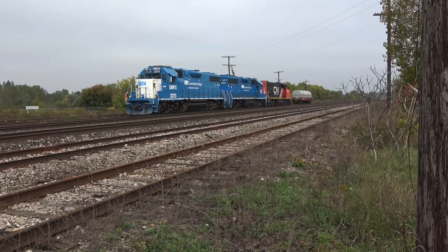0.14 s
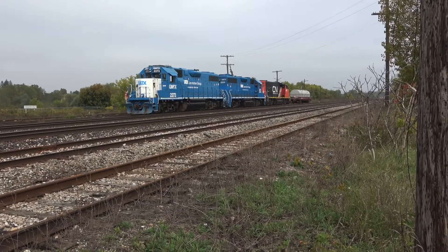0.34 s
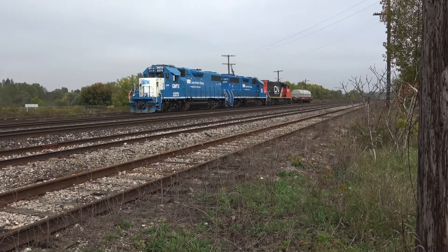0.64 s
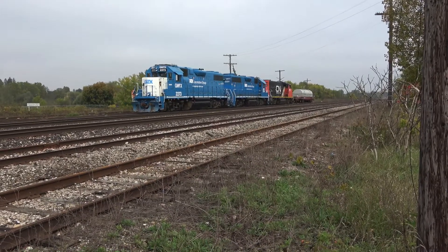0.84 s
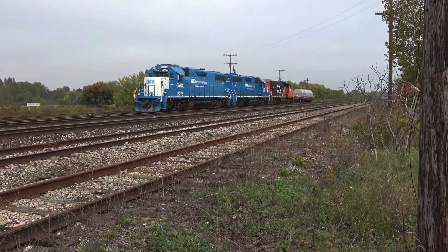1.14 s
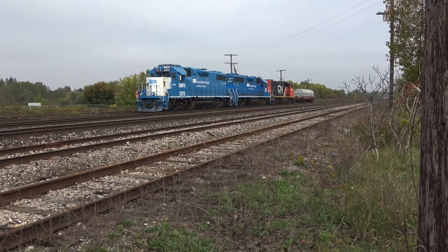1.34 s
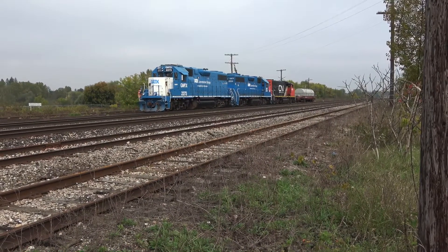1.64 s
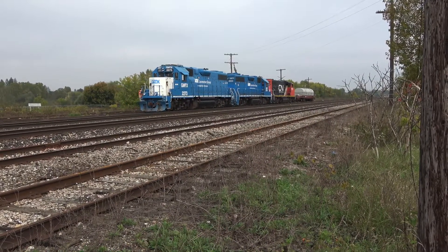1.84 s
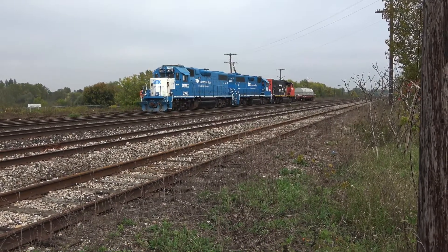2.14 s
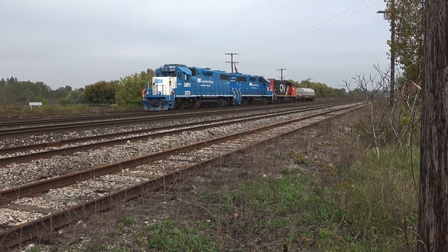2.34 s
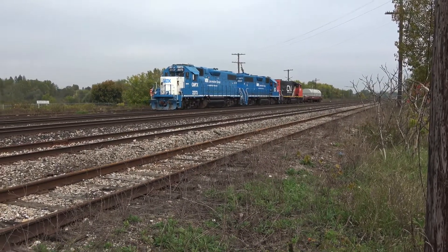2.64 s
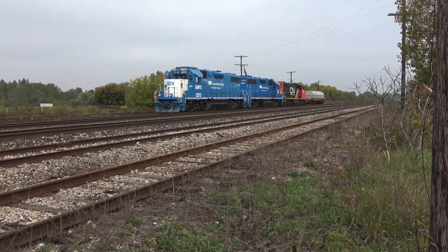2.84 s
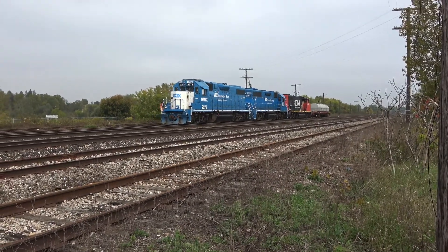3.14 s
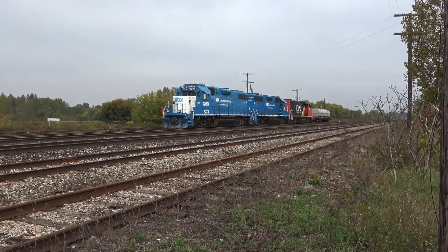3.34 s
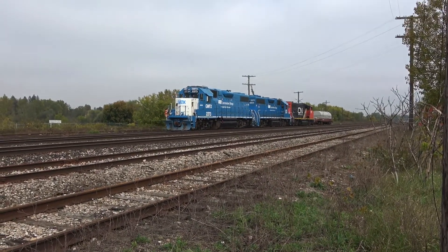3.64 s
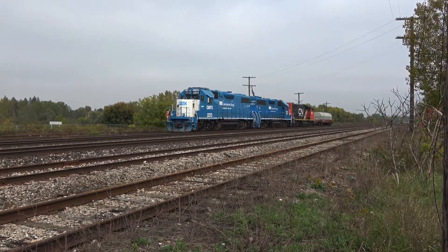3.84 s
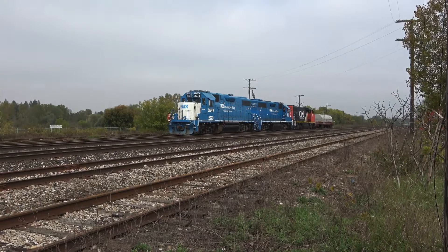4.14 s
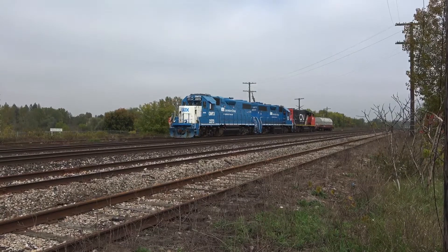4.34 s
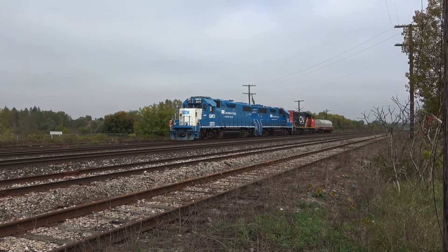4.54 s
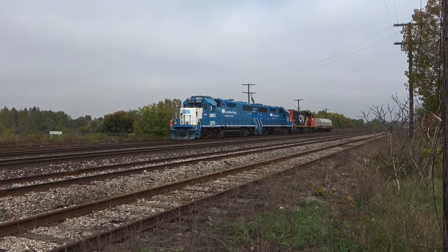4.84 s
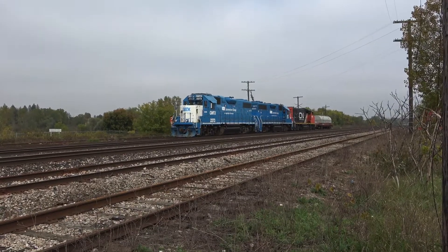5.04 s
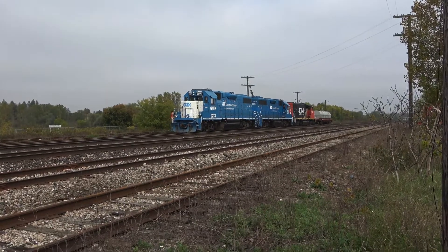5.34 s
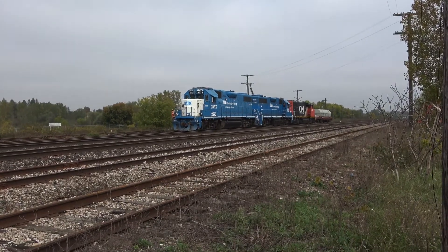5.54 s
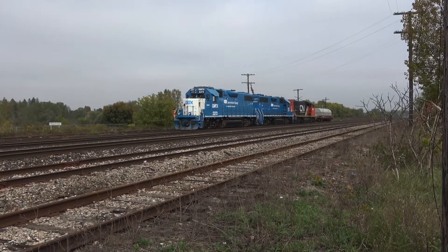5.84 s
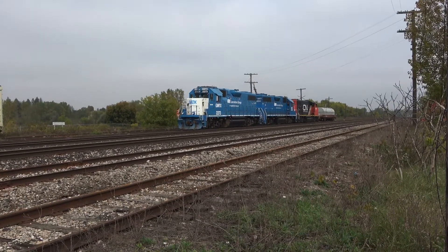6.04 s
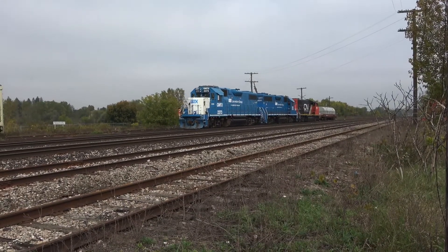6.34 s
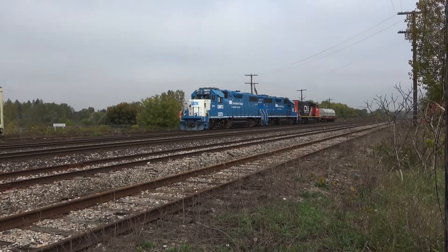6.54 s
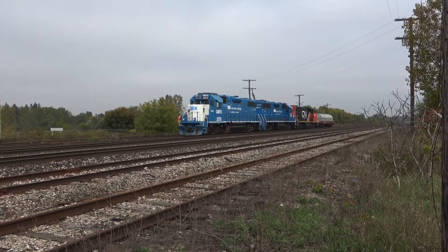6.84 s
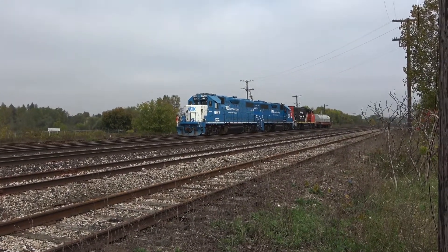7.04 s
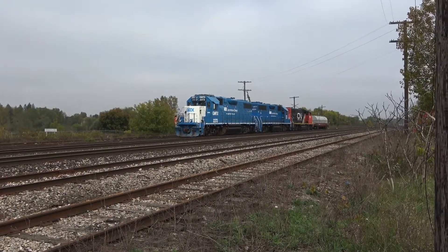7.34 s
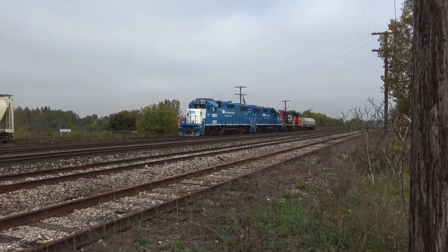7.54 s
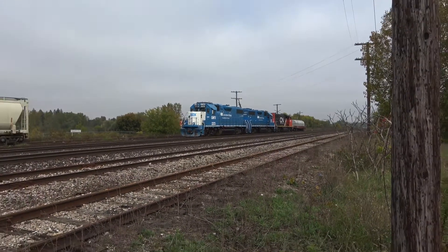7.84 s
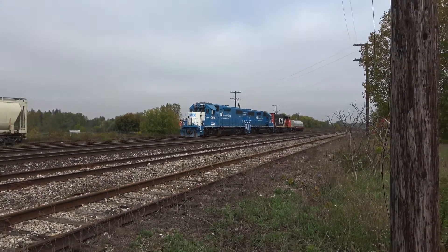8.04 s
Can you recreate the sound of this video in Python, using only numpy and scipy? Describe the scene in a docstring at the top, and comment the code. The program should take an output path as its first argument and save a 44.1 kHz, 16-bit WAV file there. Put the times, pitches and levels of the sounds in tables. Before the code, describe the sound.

Two diesel locomotives idle across rail sidings with a throbbing low drone, steady air hiss, pulsing puffs and a thin gear whine, while crickets trill nearby.

```python
"""Locomotives idling beyond the grass

Two diesel locomotives idle slowly along distant sidings, their cranks turning at slightly different speeds.
Sixteen uneven firings a turn shape exhaust tones that throb over noise roar and a whine of gear teeth.
A valve puffs filtered noise once a turn of the lead crank, over a steady leak and a dying air release.
Crickets trill in short arched tones, a grasshopper rasps in clicks of noise, and wind stirs at the microphone."""
import sys
import numpy as np
from scipy import signal
from scipy.fft import rfft, irfft
from scipy.io import wavfile

SR = 44100
rng = np.random.default_rng(int(sys.argv[2]) if len(sys.argv) > 2 else 0)


def wav_out(sig):
    """Save sig, one row per channel (or a flat mono array), as 16-bit PCM at SR to the path in sys.argv[1]."""
    wavfile.write(sys.argv[1], SR, np.round(np.clip(np.atleast_2d(sig).T, -1, 1) * 32767).astype(np.int16))


N = 361619

# Wind at the microphone: (time [s], level before its wobble [dB])
GUSTS = [(0, -87), (1.5, -60), (3.5, -61), (4.5, -56), (5.5, -53), (6.5, -61), (7.5, -52.5), (8.2, -51)]

# Blur of far insects: (frequency [Hz], relative level [dB])
INSECT_BLUR = [(4500, -48), (5800, -4), (6800, 0), (7600, 7), (8600, 4.5), (9600, -10), (12000, -19),
               (15000, -32)]
# Pace of each cricket, held until the next row, 0 = silent: (time [s], pace [strokes per s])
NEAR_CRICKET = [(0.148, 16.94), (1.92, 17.0), (2.509, 17.15), (3.15, 16.62), (4.112, 14.9), (4.313, 17.5),
                (4.541, 17.2), (5.477, 17.2), (7.512, 16.2), (8.005, 16.9)]
MIDDLE_CRICKET = [(.968, 17.5), (2.5, 0), (5.012, 16.9), (5.45, 0)]
RIGHT_CRICKET = [(0.823, 19.1), (0.98, 17.97), (2.34, 0), (2.72, 18.44), (5.24, 0), (5.398, 19),
                 (5.608, 18.4), (6.66, 0)]
SLOW_CRICKET = [(0.074, 8.15), (.6, 0), (6.735, 9), (6.957, 8.05), (7.98, 0), (8.103, 8)]
# Loudness of three crickets as they turn about: (time [s], near [dB], right [dB], slow [dB])
CRICKET_LEVEL = [(0, -53, -56, -53), (.6, -50.5, -54, -52), (1.3, -56, -53, -52), (1.9, -54, -52, -54),
                 (2.5, -56, -52, -54), (3, -50, -59, -54), (3.3, -53.5, -52, -54), (3.9, -50.5, -50, -54),
                 (4.3, -55, -53, -54), (4.85, -50, -50, -54), (5.5, -52, -51, -52), (6.2, -49.5, -50, -54),
                 (6.9, -52.5, -54, -51), (7.5, -54, -55, -51), (8.2, -51, -52, -50)]
# Voice of the middle cricket: (time [s], pitch [Hz], level [dB], left ear gain [dB])
MIDDLE_VOICE = [(0, 7740, -55, -9), (1.4, 7740, -52, -13), (2.5, 7740, -55, -9), (5, 7850, -64, -6),
                (8.2, 7940, -55, -2)]
STROKE_JITTER_S, STROKE_SCATTER_DB = .001, 1.1
# each slow chirp has a weaker, lower second stroke
ANSWER_S, ANSWER_DB, ANSWER_HZ = .053, -5, 8000

# Short dry rasps, perhaps a grasshopper: (start time [s], level [dB])
RASPS = [(3.624, -50.5), (3.808, -54), (3.918, -49), (3.966, -53), (4.0, -54), (4.038, -59), (4.069, -51),
         (4.182, -54)]
# Tone of the rasp: (frequency [Hz], relative level [dB])
RASP_COLOUR = [(5500, -30), (6600, -1), (8000, -3), (9200, -5), (10000, -16), (12500, -24), (15000, -40)]
RASP_S, RASP_TEETH_PER_S = .022, 330

# Dry ticks close by: (time [s], relative level [dB])
TICKS = [(0.1674, -54), (0.384, -54), (0.411, -55), (2.4374, -60.5), (2.4447, -43), (2.4872, -51),
         (2.8404, -56), (3.0879, -56)]

# Breathy bands that swell for a while:
# (start time [s], end time [s], fade [s], level [dB], centre [Hz], width [Hz])
HOWLS = [(2.85, 3.95, .3, -48.5, 1993, 103), (6.7, 8.2, .5, -54, 2300, 130)]

# Crank speed of each governed engine: (time [s], speed [turns per s])
LEAD_SPEED = [(0, 5.165), (5, 5.175), (6.6, 5.166), (7.2, 5.162), (8.2, 5.14)]
SECOND_SPEED = [(0, 4.978), (5, 4.984), (6.6, 4.975), (8.2, 4.96)]

# Gear whine and its neighbour:
# (time [s], whine level [dB], pitch sag [Hz], neighbour relative level [dB])
WHINE = [(0, -46.5, 1.5, -66), (1.4, -42, -1, -69), (2.0, -42, 0, -55), (3.2, -43.5, 0, -52),
         (3.8, -47.5, 0.5, -53), (4.8, -43.5, -1, -52), (5.5, -45.5, 0.5, -50), (6.2, -45, 0.5, -52),
         (6.7, -46.5, 1.5, -47.5), (7.25, -50, 1.5, -48), (7.5, -59, 11, -47), (7.8, -48, 10, -64),
         (8.0, -53, -4.5, -56), (8.2, -50, -1, -58)]
WHINE_TEETH, LOW_WHINE_TEETH, HIGH_WHINE_TEETH = 237, 227, 316   # meshes per turn of the lead crank
# Short thin squeals: (centre time [s], level [dB], pitch [Hz])
SQUEALS = [(3.4, -59, 3000), (3.7, -59, 3000), (5.47, -56, 3020), (5.65, -56.5, 3010), (5.9, -55.5, 3020),
           (6.07, -58, 3010), (6.24, -56.5, 3010), (6.42, -55, 2990), (6.55, -57, 3000), (6.7, -59, 3000)]
SQUEAL_S = .21

# Tone of the steady leak: (frequency [Hz], relative level [dB])
HISS_COLOUR = [(1470, -15), (2500, -3), (3000, -3.5), (3610, -8.5), (5660, -7.5), (6540, -12), (7740, -12),
               (9440, -21.5), (14600, -32.5), (15500, -38)]
# Tone of the air release: (frequency [Hz], relative level [dB])
RELEASE_COLOUR = [(1470, -5.5), (2500, -1), (3600, -3.5), (5700, -6.5), (7700, -9), (9400, -19),
                  (11000, -15.5), (12500, -33), (15500, -39)]
# Tone of the bright and lower parts of a puff: (frequency [Hz], relative level [dB])
BRIGHT_JET = [(6500, -6), (8500, 0.5), (10500, -1.5), (13500, -10), (15500, -22)]
LOW_JET = [(2800, -17), (4500, 0), (5500, 6), (6500, 2.5), (8000, 0), (10000, -30)]
# Strength of the valve puffs: (time [s], bright relative level [dB], lower relative level [dB])
PUFF_FORCE = [(0, -52, -43), (.25, -64, -54), (.7, -62, -61), (1.2, -58, -54), (1.7, -69, -55),
              (2, -57, -52), (2.5, -60, -53), (2.95, -58, -51), (3.3, -59, -52), (3.52, -57, -46),
              (3.72, -63, -51), (3.9, -61, -54), (4.1, -65, -54), (4.3, -59, -54), (5.5, -72, -62.5),
              (6.5, -58, -56), (7, -66, -50), (7.3, -61, -57), (7.75, -76, -55), (8.2, -55, -48)]
# Stray spits of air between the puffs: (time [s], bright relative level [dB], lower relative level [dB])
SPITS = [(0.07, -63, -49), (0.148, -64, -58.7), (0.31, -62, -53)]
LEAK_DB, LEAK_WANDER_DB = -50.5, .5
RELEASE_DB, RELEASE_T60_S = -45, 13.3
PUFF_TURN, PUFF_SCATTER_DB = .19, .8   # crank angle of the puff in turns; chance per puff
PUFF_SPURT_S, PUFF_TAIL_S, PUFF_TAIL_DB = .03, .07, -5   # a quick spurt, then a softer tail

# Tone of the blowers and fans: (frequency [Hz], relative level [dB])
ROAR_COLOUR = [(15, -28), (30, -23), (45, -13), (90, -14), (170, -5.5), (310, -14.5), (470, -12.5),
               (710, -11), (830, -13), (950, -21.5), (1120, -18.5), (1500, -23), (2100, -23), (3000, -32),
               (4500, -39.5), (7000, -86)]
ROAR_DB, ROAR_EARLY_DB, ROAR_SETTLE_S = -33, 2, 0.66   # louder at first, then settles

# Exhaust tones of each engine: (multiple of crank speed [orders], level before its waver [dB])
LEAD_ORDERS = [(7, -59), (8, -48), (9, -48), (11, -59), (16, -56), (17, -62), (18, -60), (19, -51.5),
               (21, -55), (22, -49), (23, -49.5), (24, -44), (25, -55), (26, -56), (27, -59), (28, -57),
               (29, -49.5), (30, -46), (31, -43), (32, -35), (33, -38.5), (34, -38), (35, -40), (36, -45),
               (37, -53), (38, -56), (39, -54), (42, -55), (43, -58), (48, -51.5), (70, -52.5), (77, -53),
               (79, -54.5), (99, -54), (106, -54.5), (109, -54.5), (126, -51), (127, -58), (129, -62),
               (131, -58), (133, -62), (136, -62), (137, -62.5), (142, -52), (151, -56), (158, -51.5)]
SECOND_ORDERS = [(8, -47), (9, -53), (11, -51), (12, -58), (13, -51.5), (14, -58), (15, -59), (16, -59),
                 (17, -57), (21, -55), (22, -54), (23, -54), (24, -50), (25, -50), (26, -62), (27, -52),
                 (30, -51), (31, -51), (32, -43), (33, -50.5), (34, -45), (35, -45), (36, -41), (37, -49),
                 (38, -50), (40, -48), (42, -56), (45, -62), (48, -61), (80, -58), (82, -59), (110, -64),
                 (113, -55), (120, -52.5), (131, -65), (132, -54), (133, -55.5), (134, -53.5), (136, -64),
                 (138, -57), (142, -55), (143, -59), (145, -57), (147, -55), (156, -56), (164, -53)]
# Sixteen firings in one turn of each crank, used only to line up the tones: one column, strength [dB]
LEAD_FIRING = [-1, -2, -6.5, -14, -2.5, -1, -5, -20, -12, -12, -15, -7, -2, 0, -.5, -1.5]
SECOND_FIRING = [-6, -12, -4, 0, -.5, -4, -16, -10, -7, -14, -5, -4, -8, -6, -5, -7]
LEAD_START_TURN = -.0045   # crank angle of the lead engine at the start, against the second
DRONE_ORDER = 32   # the tone that the pipes favour

# Echoes off the ballast; the long lag slides as the train moves, its treble on a path of its own:
# (time [s], lag [ms], level [dB], short echo level [dB], treble lag [ms], treble level [dB])
ECHO = [(0, 1.56, -7.5, -16, 1.6, -11), (2.5, 1.63, -8.5, -23, 1.5, -8),
        (3.1, 1.37, -10, -15.5, 1.41, -9.5), (3.6, 1.37, -13, -12, 1.34, -7),
        (3.95, 1.43, -5.5, -8, 1.5, -11), (4.3, 1.54, -11, -25, 1.53, -4),
        (5.9, 1.57, -10, -18.5, 1.59, -10), (7, 1.6, -10, -27, 1.71, -10.5),
        (8.2, 1.73, -15, -24, 1.83, -10)]
SHORT_ECHO_MS, ECHO_CUT_HZ, TREBLE_FROM_HZ = 0.97, 2800, 1880
ECHO_LEFT_HZ, ECHO_LEFT_DB = 1480, -21   # the upper part of the long echo leans left by this share

# Stereo lean of the train: (frequency [Hz], left minus right [dB])
LEAN = [(40, -1.5), (80, -1.6), (140, -.5), (230, -.1), (300, -1.3), (420, -5), (560, -3.8), (770, -4.6),
        (950, -5), (1150, -2.7), (1450, -5), (1750, -1.2), (2100, -2.4), (2800, -1.6), (4400, -1),
        (6000, -1.4), (9000, -.5), (15000, -.5)]
CUTOFF_HZ = 15700


def from_db(db):
    """Decibels to gain."""
    return 10 ** (np.asarray(db) / 20)


def rms_one(x):
    """Scales a signal to rms 1."""
    return x / np.sqrt(np.mean(x ** 2) + 1e-20)


def in_time(rows):
    """Draws each column of a table as a curve, sample by sample."""
    s, *columns = np.transpose(rows)
    return [np.interp(np.arange(N) / SR, s, column) for column in columns]


def coloured(x, points):
    """Filters by a (frequency [Hz], gain [dB]) spectrum, joined up along log frequency."""
    hz, db = np.transpose(points)
    grid = np.maximum(np.fft.rfftfreq(N, 1 / SR), 1)
    gain = from_db(np.interp(np.log(grid), np.log(hz), db))
    return irfft(rfft(x) * gain, N)


def drift(rate):
    """Slow random wander with spread 1; a higher rate moves faster."""
    r = np.exp(-80 * np.pi * rate / SR)
    # made at a fortieth of the sample rate, its run-in dropped
    noise = rng.standard_normal(N // 40 + 2002)
    slow = signal.lfilter([1], [1, -2 * r, r * r], noise)[2000:]
    return np.interp(np.arange(N) / 40, np.arange(len(slow)), rms_one(slow))


def humps(rows, width_s, delay_s=0):
    """A smooth swell of the given level centred on each (time [s], level [dB]) event."""
    marks = np.zeros(N)
    s, db = np.transpose(rows)
    at = np.clip((s + delay_s) * SR, 0, N - 1).astype(int)
    marks[at] = from_db(db)
    return signal.fftconvolve(marks, np.hanning(int(width_s * SR)), "same")


def swell(start_s, end_s, fade_s, db):
    """Rises before the start, holds, and falls after the end."""
    corners_s = [start_s - fade_s, start_s, end_s, end_s + fade_s]
    return from_db(db) * np.interp(np.arange(N) / SR, corners_s, [0, 1, 1, 0])


def sine(hz):
    """A tone of rms 1 that follows a pitch curve from a random phase."""
    return np.sqrt(2) * np.sin(2 * np.pi * (np.cumsum(hz) / SR + rng.random()))


def breeze():
    """Light wind on the microphone ports: lumpy low noise, its own in each."""
    band = signal.butter(2, [18, 260], "band", fs=SR, output="sos")
    low = signal.sosfilt(band, rng.standard_normal((2, N)))
    return from_db(in_time(GUSTS)[0] + 2.5 * drift(9.5)) * rms_one(low)


def chorus(count):
    """Farther crickets, each trilling at its own pitch and pace, over a blur that differs at each ear."""
    out = np.zeros((2, N))
    for hz, per_s, pan_db in rng.uniform([7650, 15, 4], [8050, 20, 12], (count, 3)):
        stroke_turns = np.cumsum(per_s + 0.65 * drift(0.75)) / SR
        stroke = np.maximum(np.cos(2 * np.pi * stroke_turns), 0) ** 3
        # the left ear moves by pan_db and level wanders in both
        gain = from_db(-65 + 3 * drift(.6) + pan_db * np.array([[-1], [0]]))
        out += gain * stroke * sine(hz + 90 * drift(6.0))
    blur = coloured(rng.standard_normal((2, N)), INSECT_BLUR)
    return out + from_db([[-63], [-60]]) * rms_one(blur)


def strokes(song, level_db):
    """Evenly paced wing strokes, each a little off in time and strength: (time [s], level [dB])."""
    start, per_s = np.transpose(song)
    ends = [*start[1:], N / SR]
    runs = [np.arange(a, b - .02, 1 / pace) for a, b, pace in zip(start, ends, per_s) if pace > 0]
    s = np.concatenate(runs)
    time_chance, level_chance = rng.standard_normal((2, len(s)))
    db = level_db[(s * SR).astype(int)] + STROKE_SCATTER_DB * level_chance
    return np.column_stack([s + STROKE_JITTER_S * time_chance, db])


def cricket(chirps, hz, fall_hz, arch_hz, width_s):
    """Each wing stroke is a short tone that arches in pitch and slides down, or up if fall_hz is negative."""
    even = chirps * [1, 0]   # same times, all at 0 dB
    sag = humps(even, width_s, delay_s=width_s / 2) - humps(even, width_s, delay_s=-width_s / 2)
    arch = 1 - humps(even, width_s)
    pitch = hz - fall_hz * sag - arch_hz * arch + 18 * drift(12.0)
    return humps(chirps, width_s) * sine(pitch)


def crickets():
    """Trills from wing strokes: one cricket almost ahead, one between, two far to the right."""
    near_db, right_db, slow_db = in_time(CRICKET_LEVEL)
    near = cricket(strokes(NEAR_CRICKET, near_db), 7560, fall_hz=160, arch_hz=320, width_s=0.022)
    middle_hz, middle_db, left_db = in_time(MIDDLE_VOICE)
    middle = cricket(strokes(MIDDLE_CRICKET, middle_db), middle_hz, fall_hz=120, arch_hz=350, width_s=0.022)
    right_hz = 8150 + 35 * drift(.6)
    side = cricket(strokes(RIGHT_CRICKET, right_db), right_hz, fall_hz=-150, arch_hz=380, width_s=0.016)
    slow = strokes(SLOW_CRICKET, slow_db)
    side = side + cricket(slow, 8330, fall_hz=60, arch_hz=500, width_s=0.024)
    answer = slow + [ANSWER_S, ANSWER_DB]
    side = side + cricket(answer, ANSWER_HZ, fall_hz=60, arch_hz=200, width_s=0.018)
    out = near * from_db([[-3.5], [1.6]])
    out = out + middle * from_db([left_db, 0 * left_db])
    return out + side * from_db([[-13], [.9]])


def rasps():
    """A row of teeth scraped quickly: fast pulses in bright noise, with a quick start."""
    teeth = .35 + np.cos(np.pi * RASP_TEETH_PER_S * np.arange(N) / SR) ** 4
    marks = np.zeros(N)
    s, db = np.transpose(RASPS)
    marks[(s * SR).astype(int)] = from_db(db)
    envelope = np.convolve(marks, signal.windows.tukey(int(RASP_S * SR), .3))[:N]
    return envelope * teeth * rms_one(coloured(rng.standard_normal(N), RASP_COLOUR))


def ticks():
    """Tiny snaps, a few milliseconds of bright noise."""
    band = signal.butter(2, [8500, 14500], "band", fs=SR, output="sos")
    bright = signal.sosfilt(band, rng.standard_normal(N))
    return from_db(3.0) * humps(TICKS, .003, delay_s=.001) * bright


def howl(start_s, end_s, fade_s, db, hz, width_hz):
    """A breathy swell of noise through a narrow resonance."""
    band = signal.butter(2, [hz - width_hz / 2, hz + width_hz / 2], "band", fs=SR, output="sos")
    return swell(start_s, end_s, fade_s, db) * rms_one(signal.sosfilt(band, rng.standard_normal(N)))


def whine(hz, gain, flutter_db, wander_hz):
    """A tooth-mesh tone; the long air path makes it flutter in level and wander in pitch."""
    return gain * from_db(flutter_db * drift(30.0)) * sine(hz + wander_hz * drift(12.0))


def gears():
    """Three tooth meshes geared to the lead crank, and the thin squeals."""
    turns_per_s = in_time(LEAD_SPEED)[0]
    db, sag_hz, low_db = in_time(WHINE)
    out = whine(WHINE_TEETH * turns_per_s - sag_hz, from_db(db), flutter_db=3.2, wander_hz=2.0)
    out = out + whine(LOW_WHINE_TEETH * turns_per_s, from_db(low_db - 2.5), flutter_db=4.0, wander_hz=5.0)
    out = out + whine(HIGH_WHINE_TEETH * turns_per_s, from_db(-62), flutter_db=3.0, wander_hz=4.0)
    squeal_hz = in_time(SQUEALS)[1]
    squeal_gain = humps(np.array(SQUEALS)[:, :2], SQUEAL_S)
    return out + whine(squeal_hz, squeal_gain, flutter_db=3.5, wander_hz=14.0)


def puffs():
    """One puff each turn of the lead crank, and the stray spits: (time [s], bright [dB], lower [dB])."""
    turns = np.cumsum(in_time(LEAD_SPEED)[0]) / SR
    at = np.searchsorted(turns, np.arange(PUFF_TURN, turns[-1]))
    force = np.transpose(in_time(PUFF_FORCE))[at]
    force = force + PUFF_SCATTER_DB * rng.standard_normal((len(at), 2))
    return np.vstack([np.column_stack([at / SR, force]), SPITS])


def air():
    """Turbulent air as noise: a sputtering leak, a dying release, and puffs with a faint valve squeak after."""
    leak_rush, release_rush, jet = rng.standard_normal((3, N))
    leak = from_db(LEAK_DB + LEAK_WANDER_DB * drift(1.0)) * rms_one(coloured(leak_rush, HISS_COLOUR))
    release_db = RELEASE_DB - 60 * np.arange(N) / SR / RELEASE_T60_S
    release = from_db(release_db) * rms_one(coloured(release_rush, RELEASE_COLOUR))
    sputter = from_db(1.1 * drift(14.0))

    rows = puffs()
    bright, low = rows[:, [0, 1]], rows[:, [0, 2]]
    spurt = humps(bright, PUFF_SPURT_S, delay_s=-.006)
    spurt = spurt + from_db(PUFF_TAIL_DB) * humps(bright, PUFF_TAIL_S, delay_s=.01)
    puff = from_db(1.0) * spurt * rms_one(coloured(jet, BRIGHT_JET))
    puff = puff + humps(low, 0.038, delay_s=0.0026) * rms_one(coloured(jet, LOW_JET))
    squeak = from_db(1.5) * humps(bright, .045, delay_s=.037) * sine(4437 + 15 * drift(30.0))
    return sputter * (leak + release) + puff + squeak


def roar():
    """Broad noise of blowers and fans."""
    db = ROAR_DB + ROAR_EARLY_DB * np.exp(-np.arange(N) / SR / ROAR_SETTLE_S)
    return from_db(db) * rms_one(coloured(rng.standard_normal(N), ROAR_COLOUR))


def exhaust(speed, start_turn, orders, firing_db, waver_db, jitter_ms, scatter):
    """Sixteen uneven firings a turn set how the tones line up; far from the drone the pipes scatter them.
    Moving air makes groups of tones waver in level and arrival time, which blurs the high ones most."""
    turns_per_s = in_time(speed)[0]
    turns = start_turn + np.cumsum(turns_per_s) / SR
    angle = np.arange(4096) / 4096   # one turn of the crank
    patterns = np.zeros((6, 4096))   # six groups that waver apart
    beat = np.angle(np.fft.fft(from_db(firing_db)))
    slip = rng.standard_normal(200)
    for k, (order, db) in enumerate(orders):
        offset = beat[order % 16] + scatter * (order - DRONE_ORDER) * slip[order]
        patterns[k % 6] += np.sqrt(2) * from_db(db) * np.cos(2 * np.pi * order * angle + offset)
    out = np.zeros(N)
    for pattern in patterns:
        late_turns = turns_per_s * jitter_ms / 1000 * drift(3.4)
        tones = np.interp(turns + late_turns, angle, pattern, period=1)
        out += from_db(waver_db * drift(1.1)) * tones
    return out


def delayed(x, ms):
    """Reads a signal late by a steady or sliding lag."""
    now = np.arange(N)
    return np.interp(now - ms * SR / 1000, now, x)


def over_ballast(direct):
    """Dull echoes join the direct sound and cut notches that slide as the lag changes."""
    lag_ms, db, short_db, treble_ms, treble_db = in_time(ECHO)
    dull = signal.sosfilt(signal.butter(1, ECHO_CUT_HZ, fs=SR, output="sos"), direct)
    # the lowest tones find no clean echo
    near = coloured(dull, [(280, -25), (380, 0)])
    far = coloured(dull, [(330, -25), (620, 0)])
    treble_band = [(TREBLE_FROM_HZ / 1.15, -30), (TREBLE_FROM_HZ * 1.1, 0), (3000, 0), (4300, -12)]
    treble = coloured(far, treble_band)
    long_echo = from_db(db) * delayed(far - treble, lag_ms)
    long_echo = long_echo + from_db(treble_db) * delayed(treble, treble_ms)
    short_echo = from_db(short_db) * delayed(near, SHORT_ECHO_MS)
    upper = coloured(long_echo, [(ECHO_LEFT_HZ / 2.0, -40), (ECHO_LEFT_HZ, ECHO_LEFT_DB)])
    return direct + from_db([[.4], [-.6]]) * (long_echo + short_echo) + upper * [[1], [-1]]


def scene():
    """The train leans to one side by pitch; most of the crickets sit to the right."""
    tones = exhaust(LEAD_SPEED, LEAD_START_TURN, LEAD_ORDERS, LEAD_FIRING,
                    waver_db=1.2, jitter_ms=.24, scatter=.07)
    tones = tones + exhaust(SECOND_SPEED, 0, SECOND_ORDERS, SECOND_FIRING,
                            waver_db=1.5, jitter_ms=.28, scatter=.2)
    train = over_ballast(tones + roar() + air())
    train = train + gears() + sum(howl(*row) for row in HOWLS)
    train = train + from_db([[1.5], [-2]]) * ticks()
    # half of the lean goes to each ear
    left = coloured(train[0], [(hz, db / 2) for hz, db in LEAN])
    right = coloured(train[1], [(hz, -db / 2) for hz, db in LEAN])
    return np.array([left, right]) + crickets() + chorus(count=3) + rasps() + breeze()


def record(dry):
    """A steep low-pass cuts the top."""
    return signal.sosfilt(signal.ellip(12, .5, 70, CUTOFF_HZ, fs=SR, output="sos"), dry)


dry = scene()
out = record(dry)
wav_out(out)
```